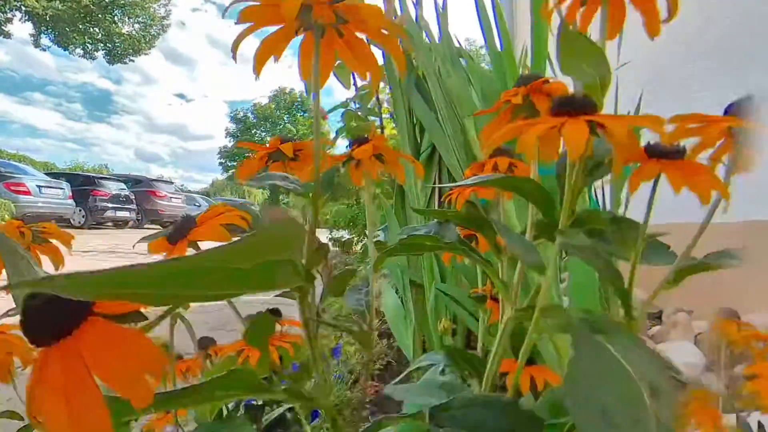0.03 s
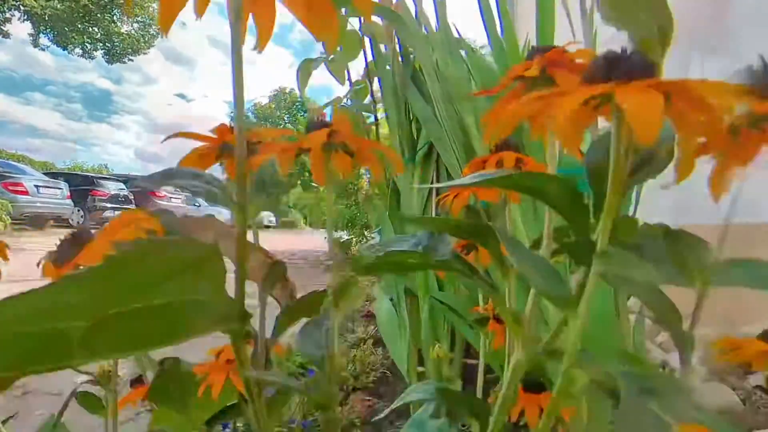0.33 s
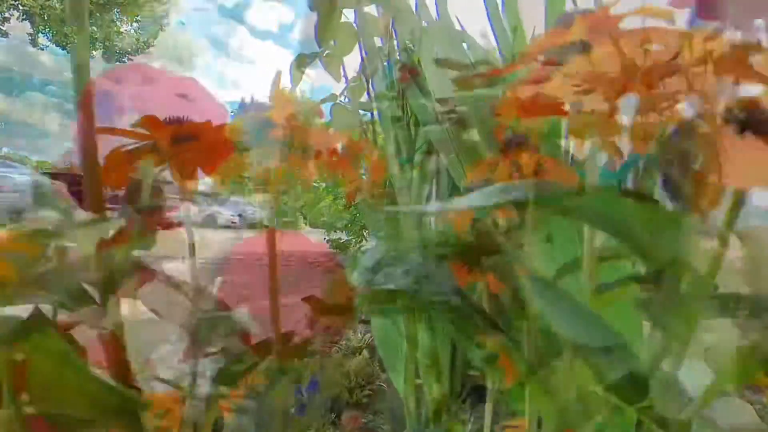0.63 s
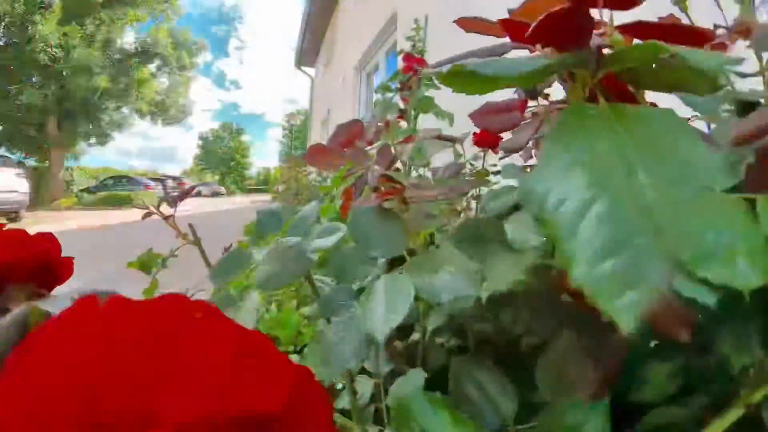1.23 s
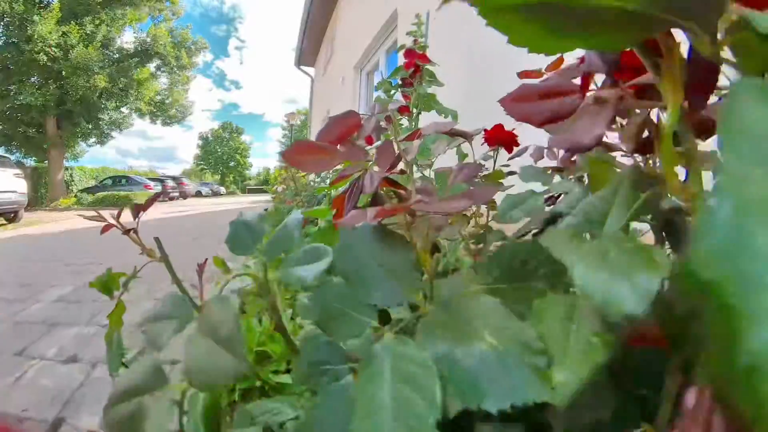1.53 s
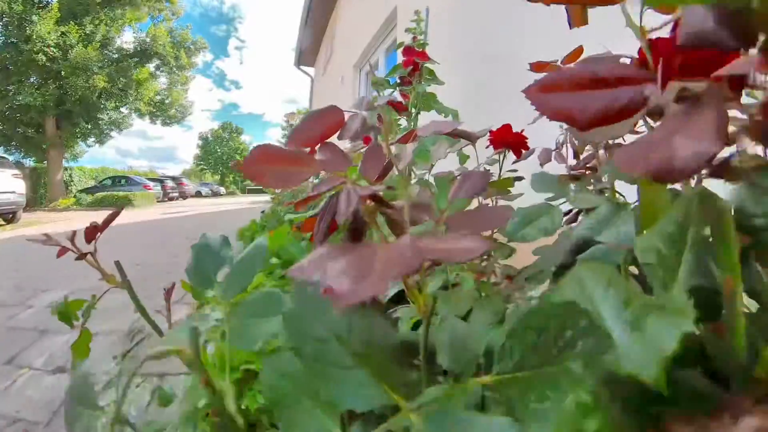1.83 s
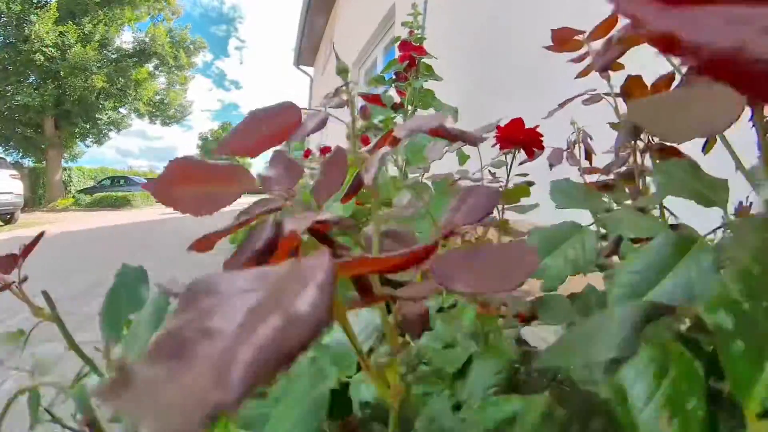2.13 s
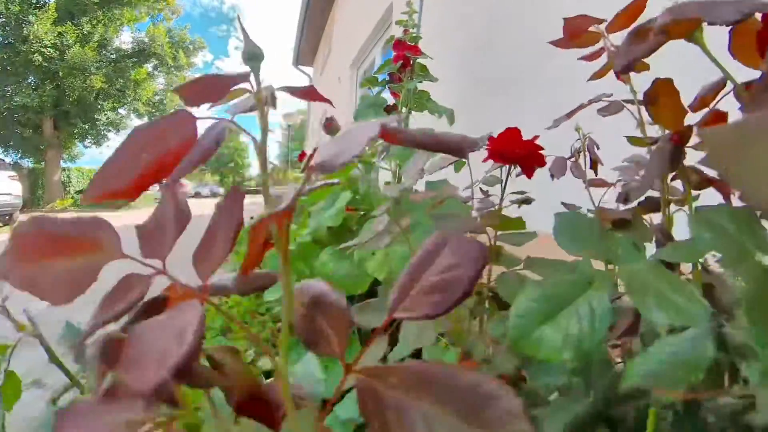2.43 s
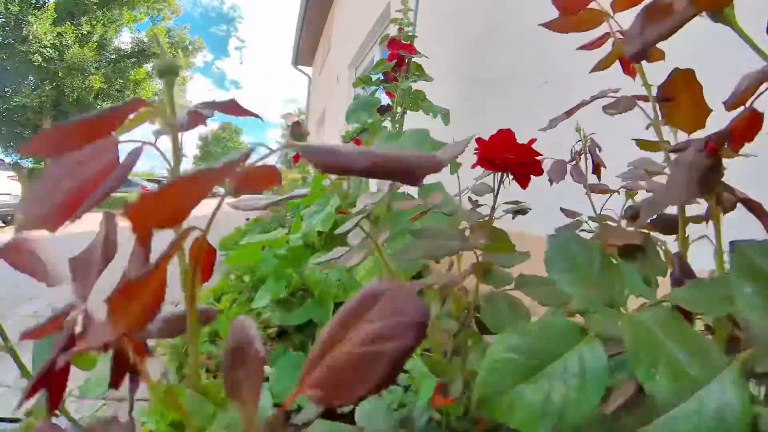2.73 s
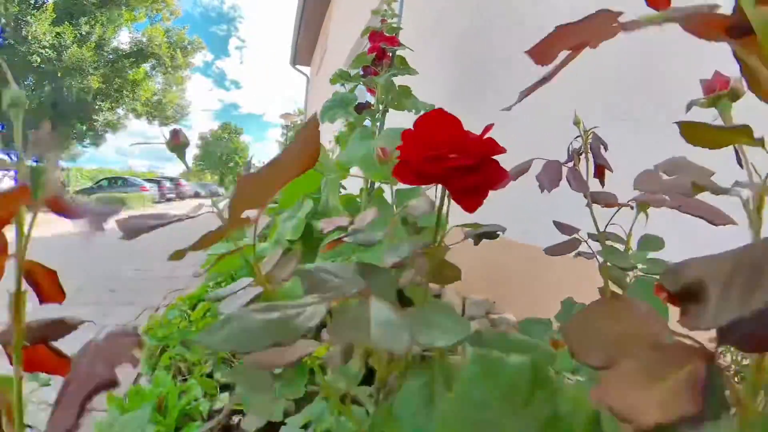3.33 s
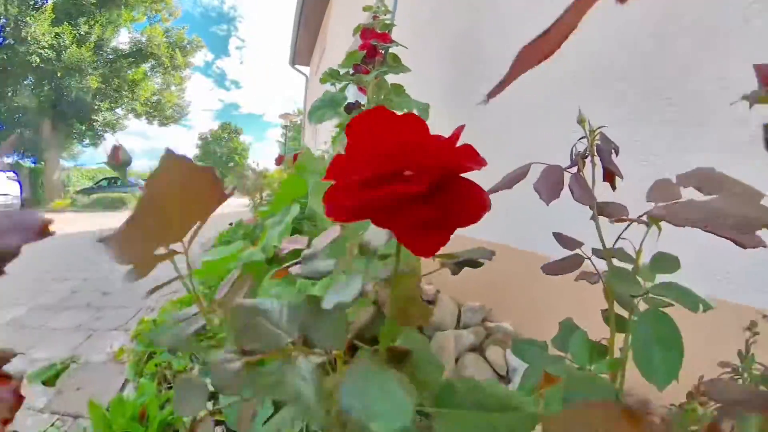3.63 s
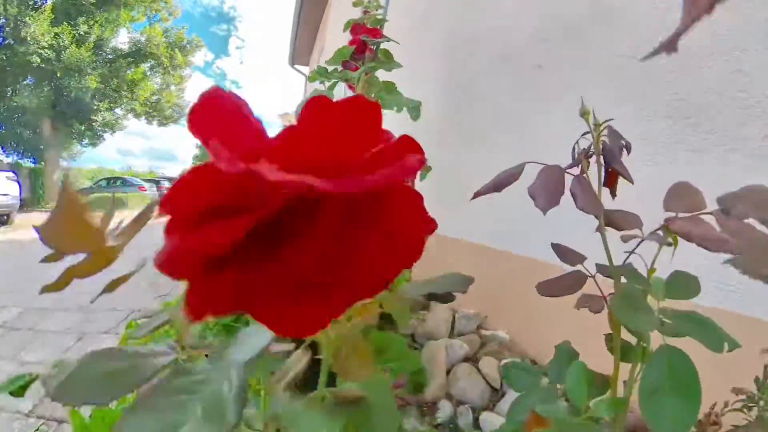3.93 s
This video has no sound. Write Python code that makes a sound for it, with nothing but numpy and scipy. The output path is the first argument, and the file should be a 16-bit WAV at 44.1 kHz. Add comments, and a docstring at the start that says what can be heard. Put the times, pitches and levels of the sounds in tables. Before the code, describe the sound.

Leaves rustle and stalks bump against a hand-held microphone moving through garden plants. After a lull, the brushing returns with small stem snaps, a scrape and one hard knock, all close and dry over a low outdoor wash.

```python
"""A hand-held camera pushes through garden plants: close, dry, nearly mono except in the treble.
First leaves swish past, dry canes clack and stalks bump the camera. A lull follows, with a knock and
a rub near 1.2 s. From 2 s leaves swish again and tap the housing, stalks knock and rub, stems snap.
At 3 s a leaf scrapes over the microphone; the hardest knock follows at 3.2 s, then more ticks and rubs.
A low outdoor wash, far tree hiss and the rumble of the grip run underneath to the end."""
import sys
import numpy as np
from scipy import signal
from scipy.io import wavfile
from scipy.ndimage import uniform_filter1d

SR = 44100
rng = np.random.default_rng(int(sys.argv[2]) if len(sys.argv) > 2 else 0)


def master_out(mix):
    """Clip the mix to full scale and print it as 16-bit PCM to the path in sys.argv[1]."""
    frames = np.transpose(np.atleast_2d(mix))
    ceiling = np.clip(frames, -1, 1)
    pcm = np.round(ceiling * 32767).astype(np.int16)
    wavfile.write(sys.argv[1], SR, pcm)


N = 176400  # 4 s

# Leaf passes: t/s, rise/s, t60/s, level/dB, tilt/(dB/oct), blade f/Hz
SWISHES = [(.087, .002, 0.66, -57.5, 0.5, 6300), (0.179, 0.0035, 0.25, -45.5, -4.5, 4900),
           (0.202, .008, 0.44, -53.5, -4, 5300), (.348, 0.016, -0.06, -54, -4, 5130),
           (2.081, 0.0045, 0.1, -52, 3, 6600), (2.193, .003, 1.3, -62, -2, 5200),
           (2.475, 0.032, 0.25, -53, 1.5, 5760), (2.535, 0.019, 0.9, -51.5, .8, 6100),
           (2.744, 0.0053, 0.5, -53, 8, 7160), (2.945, 0.013, 0.65, -49.5, -0.5, 4950),
           (3.215, 0.0032, 0.2, -56, -3, 2550), (3.425, 0.031, 0.7, -57, 0.5, 3950),
           (3.659, 0.0082, 0.46, -60, 0, 7600)]
# Leaf friction spectrum: f/Hz, level/dB
LEAF_SPECTRUM = [(250, -2.5), (700, -3), (1300, 4), (1950, 2), (2500, 2.5), (4500, -0.5), (6500, 2),
                 (7600, -4.5), (9000, -21), (11000, -60.5)]

def leaf_swishes():
    """Friction grains and sparse crackles ring a blade, swelling as it catches, fading as it slides off."""
    out, t = np.zeros(N), np.arange(SR // 2) / SR
    for start_s, rise_s, t60_s, db, tilt, hz in SWISHES:
        grains = unit_rms(slips(per_s=4600, spread_db=2))
        crackles = amp(-4.5) * unit_rms(slips(per_s=54, spread_db=0.85))
        hiss = unit_rms(colour((grains + crackles)[:len(t)], tilted(LEAF_SPECTRUM, tilt)))
        blade = amp(-9.5) * blade_mode(hiss, hz, width_hz=820)
        attack = np.minimum(t / rise_s, 1)
        fade = decay(np.maximum(t - rise_s, 0), max(t60_s, 0.04))
        add(out, start_s, amp(db) * unit_rms(hiss + blade) * attack * fade)
    return out


# Leaf taps: t/s, peak level/dB, f/Hz
TAPS = [(1.121, -33, 1230), (2.193, -33, 2440), (2.197, -33, 2230), (2.2052, -32.5, 1300),
        (2.2355, -36, 1610), (2.2811, -32, 970)]
# Tap crackle spectrum: f/Hz, level/dB
TAP_SPECTRUM = [(400, 3), (900, -4), (2800, -9), (3500, -31), (9000, -41)]

def leaf_taps(rise_s=0.00038):
    """A blade slaps the housing, crackles and rings for a few cycles."""
    out, t = np.zeros(N), np.arange(SR // 20) / SR
    envelope = np.minimum(t / rise_s, 1) * decay(t, t60_s=0.006)
    for start_s, db, hz in TAPS:
        crackle = amp(-1.5) * unit_rms(colour(rng.standard_normal(len(t)), TAP_SPECTRUM))
        ring = np.sin(2 * np.pi * hz * t)
        add(out, start_s, amp(db) * unit_peak((crackle - ring) * envelope))
    return out


# Dragged blade modes: f/Hz, width/Hz, level/dB
SCRAPE_MODES = [(580, 140, 4), (776, 96, 4), (1050, 480, 0.5), (1690, 290, -0.5), (2070, 110, -4),
                (2700, 610, -4)]
# Scrape filter: f/Hz, level/dB
SCRAPE_FILTER = [(200, 8.5), (500, 7.5), (3000, 5), (3800, -10), (8000, -28.5)]
# Scrape envelope: t/s, level/dB
SCRAPE_LEVEL = [(2.93, -73), (2.95, -49), (2.962, -60), (2.966, -40.5), (2.995, -41), (3.017, -40),
                (3.026, -58.5), (3.04, -69)]

def leaf_scrape():
    """A leaf judders across the microphone in uneven slips that ring its blade."""
    drive = slips(per_s=1100, spread_db=-2)
    blade = sum(amp(db) * blade_mode(drive, hz, width_hz) for hz, width_hz, db in SCRAPE_MODES)
    return unit_rms(colour(blade, SCRAPE_FILTER)) * gain_curve(SCRAPE_LEVEL)


# Stem snaps: t/s, peak level/dB, splinter t60/s, tilt/(dB/oct), main resonance f/Hz
TICKS = [(2.2165, -30, 0.031, -4.5, 5230), (2.348, -38, 0.062, -4, 5330), (2.396, -33.5, 0.008, 2.5, 6300),
         (2.546, -31, 0.008, 11, 6000), (2.759, -31.5, 0.032, -6, 6530), (3.089, -18, 0.029, -1, 6390),
         (3.2263, -23.5, 0.033, -11, 5150), (3.2547, -30, 0.0016, -5, 5260),
         (3.279, -30.5, 0.0044, 0, 5900), (3.3051, -38, 0.003, 2, 6430), (3.4195, -31, 0.023, -3, 5870),
         (3.4666, -33, 0.0096, -0.5, 5500), (3.5222, -24.5, 0.026, -3.5, 6100),
         (3.5273, -35, 0.0092, 3, 5340)]
# Spectrum of a stem ringing at STEM_HZ: f/Hz, level/dB
STEM_SPECTRUM = [(1250, -8), (1650, -1.5), (2050, -11), (2950, -10), (3650, 3), (4250, -9.5), (5000, -4),
                 (6400, 3.5), (7100, -5), (8200, -7), (8900, -22.5), (12000, -49)]
STEM_HZ = 6400

def stem_ticks():
    """A stem snaps: one click, then fast-dying splinters. Thicker stems ring lower."""
    out, t = np.zeros(N), np.arange(SR // 10) / SR
    click = 1.0 * (t == 0)
    for start_s, db, t60_s, tilt, hz in TICKS:
        splinters = amp(-19) * rng.standard_normal(len(t)) * decay(t, t60_s)
        stem = [(f * hz / STEM_HZ, band_db) for f, band_db in STEM_SPECTRUM]
        add(out, start_s, amp(db) * unit_peak(colour(click + splinters, tilted(stem, tilt))))
    return out


# Hard stalk hits: t/s, impact peak level/dB, tilt/(dB/oct)
KNOCKS = [(1.1213, -34.5, -2), (2.084, -22, -3), (3.2306, -13.5, -0.5)]
# Impact spectrum: f/Hz, level/dB
IMPACT_SPECTRUM = [(100, 0), (500, 9.5), (1200, -6.5), (2500, -16.5), (6000, -23.5), (9000, -54)]
# Housing modes: f/Hz, level/dB, t60/s
HOUSING_MODES = [(145, 0.5, 0.091), (237, -3.5, 0.048), (329, 5, 0.026), (680, -3.5, .03)]

def stalk_knocks(ring_db=-3.5, ring_delay_s=0.0012):
    """A sharp impact, duller for a softer stalk, then the housing's short low ring."""
    out, t = np.zeros(N), np.arange(SR // 5) / SR
    click = 1.0 * (t == 0)
    ring = struck(t, HOUSING_MODES)
    for start_s, db, tilt in KNOCKS:
        impact = unit_peak(colour(click, tilted(IMPACT_SPECTRUM, tilt)))
        add(out, start_s, -amp(db) * impact)
        add(out, start_s + ring_delay_s, amp(db + ring_db) * ring)
    return out


# Soft stalk hits: centre t/s, peak level/dB, f/Hz
BUMPS = [(0.058, -29, 48.7), (0.105, -29.5, 60), (.316, -33.5, 74), (1.425, -32, 98.5), (2.122, -32, 69),
         (2.136, -28.5, 110), (2.156, -30, 49.7), (3.192, -18.5, 55.6), (3.2108, -18.5, 75.5),
         (3.224, -21, 103), (3.259, -22, 68), (3.556, -24.5, 86)]

def stalk_bumps():
    """A soft push on the camera: one pressure swell with a dip on either side."""
    out, t = np.zeros(N), np.arange(-SR // 25, SR // 25) / SR
    for centre_s, db, hz in BUMPS:
        window = np.exp(-(hz * t / 0.45) ** 2)
        add(out, centre_s + t[0], amp(db) * np.cos(2 * np.pi * hz * t) * window)
    return out


# Stalk drags: t/s, length/s, level/dB
RUBS = [(1.227, 0.049, -48), (2.057, 0.14, -47), (2.395, 0.27, -48.5), (3.195, 0.079, -36.5),
        (3.391, 0.22, -42)]
# Stalk friction spectrum: f/Hz, level/dB
RUB_SPECTRUM = [(80, 0), (180, -0.5), (350, 3.5), (480, -7.5), (640, -5), (1000, -15.5), (2500, -51)]

def stalk_rubs():
    """Stalks drag along the housing: dull slips that swell and fade."""
    envelope = np.zeros(N)
    for start_s, length_s, db in RUBS:
        arch = np.sin(np.linspace(0, np.pi, round(length_s * SR)))
        add(envelope, start_s, amp(db) * arch)
    return envelope * unit_rms(colour(slips(per_s=770, spread_db=3.5), RUB_SPECTRUM))


# Cane hits: t/s, peak level/dB, tilt/(dB/oct)
CLACKS = [(.087, -44, 8), (0.1844, -35.5, -33)]
# Cane modes: f/Hz, level/dB, t60/s
CANE_MODES = [(1820, 6, 0.033), (1981, -4, 0.32), (3640, 1.5, 0.063), (6300, -7, 0.097)]

def cane_clacks():
    """Dry canes strike together and ring faintly."""
    out, t = np.zeros(N), np.arange(SR // 2) / SR
    for start_s, db, tilt in CLACKS:
        add(out, start_s, amp(db) * struck(t, CANE_MODES, tilt))
    return out


# Wash, tree and grip spectra: f/Hz, level/dB
WASH_SPECTRUM = [(15, -50), (25, -10.5), (54, -1), (103, -5), (205, -10.5), (269, -13), (354, -16.5),
                 (500, -20), (625, -21), (1680, -36), (5810, -40), (7260, -43.5), (9300, -65.5),
                 (12100, -100.5)]
TREE_SPECTRUM = [(800, -19), (1500, 7.5), (3000, 6.5), (6500, 7.5), (7500, -2), (9000, -22.5)]
GRIP_SPECTRUM = [(15, -22.5), (42, 2.5), (70, -1.5), (130, -9), (300, -36.5), (1000, -77)]
# Wash, tree and grip envelopes: t/s, level/dB
WASH_LEVEL = [(0, -46.5), (.7, -50.5), (1.2, -46), (1.9, -46), (2.6, -44), (4, -45.5)]
TREE_LEVEL = [(0, -75.5), (.7, -71.5), (1.3, -65.5), (2.2, -64), (3.4, -63), (4, -63)]
GRIP_LEVEL = [(0, -39.5), (.15, -50), (.6, -50), (1.9, -60.5), (2.5, -44.5), (2.8, -52), (3.2, -41),
              (3.7, -53), (4, -40)]

def background():
    """Low outdoor wash, hiss of distant trees, rumble of the hand on the grip."""
    wash = noise(WASH_SPECTRUM) * gain_curve(WASH_LEVEL)
    trees = noise(TREE_SPECTRUM) * gain_curve(TREE_LEVEL)
    grip = noise(GRIP_SPECTRUM) * gain_curve(GRIP_LEVEL)
    return wash + trees + grip


def slips(per_s, spread_db):
    """Stick-slip clicks of random time, sign and size."""
    size = amp(spread_db * np.minimum(rng.exponential(1, N), 4))
    return size * rng.choice([-1, 1], N) * (rng.random(N) < per_s / SR)


def blade_mode(drive, hz, width_hz, wander=0.06):
    """Leaf resonance at rms 1; its centre wanders as the blade bends."""
    bend = unit_rms(uniform_filter1d(rng.standard_normal(len(drive)), size=1500))
    carrier = np.exp(2j * np.pi * np.cumsum(hz * (1 + wander * bend)) / SR)
    pole = np.exp(-np.pi * width_hz / SR)
    baseband = signal.lfilter([1 - pole], [1, -pole], drive / carrier)
    return unit_rms((carrier * baseband).real)


def struck(t, modes, tilt=0):
    """Decaying sine modes of a struck body, at peak 1."""
    return unit_peak(sum(amp(db + tilt * np.log2(hz)) * np.sin(2 * np.pi * hz * t) * decay(t, t60_s)
                         for hz, db, t60_s in modes))


def flicker(x, depth_db):
    """The treble flickers in patches a few hundred Hz wide and tens of ms long."""
    frames = dict(nperseg=512, noverlap=384)
    hz, _, spectra = signal.stft(x, SR, **frames)
    patches = uniform_filter1d(rng.standard_normal(spectra.shape), size=4, axis=0)
    patches = unit_rms(uniform_filter1d(patches, size=12, axis=1))
    treble = np.minimum(hz / 2000, 1)[:, None]
    return signal.istft(spectra * amp(depth_db * patches * treble), **frames)[1][:N]


def colour(x, spectrum, size=8192):
    """Minimum-phase filter from (f/Hz, level/dB) points."""
    hz, db = np.transpose(spectrum)
    bins_hz = abs(np.fft.fftfreq(size, 1 / SR))
    log_gain = np.log(amp(np.interp(np.log(bins_hz + 1), np.log(hz + 1), db)))
    response = np.exp(np.conj(signal.hilbert(log_gain)))
    impulse = np.fft.ifft(response).real[:size // 2]
    return signal.fftconvolve(x, impulse)[:len(x)]


def tilted(spectrum, db_per_oct):
    return [(hz, db + db_per_oct * np.log2(hz)) for hz, db in spectrum]


def noise(spectrum):
    return unit_rms(colour(rng.standard_normal(N), spectrum))


def gain_curve(points):
    return amp(np.interp(np.arange(N) / SR, *np.transpose(points)))


def decay(t, t60_s):
    return np.exp(-np.log(1000) * t / t60_s)


def amp(db):
    return 10 ** (np.asarray(db) / 20)


def unit_rms(x):
    return x / np.sqrt(np.mean(x ** 2) + 1e-20)


def unit_peak(x):
    return x / (abs(x).max() + 1e-20)


def add(mix, start_s, sound):
    part = mix[max(round(start_s * SR), 0):][:len(sound)]
    part += sound[:len(part)]


def scene():
    """Contacts sit in the centre; background and swishes spread a little in the treble."""
    contacts = (stalk_bumps() + stalk_knocks() + cane_clacks() + stem_ticks()
                + leaf_taps() + leaf_scrape() + stalk_rubs())
    bed = flicker(background(), depth_db=2)
    rustle = flicker(leaf_swishes(), depth_db=4)
    mid = contacts + rustle + bed
    side = treble_spread()
    return np.array([mid + side, mid - side])


# Side-channel filter: f/Hz, level/dB
SIDE_FILTER = [(1000, -66.5), (2600, -55.5), (3100, -9), (4500, -5), (6000, -8), (6800, -44.5)]

def treble_spread():
    """Side signal: independent background and quieter swishes, mainly 3-6 kHz."""
    diffuse = background() + amp(-10) * leaf_swishes()
    return colour(flicker(diffuse, depth_db=4), SIDE_FILTER)


def record(dry):
    """The recorder's band limit."""
    cutoff_hz = 9450
    lowpass = signal.firwin(95, cutoff_hz, window=("kaiser", 5), fs=SR)
    return signal.oaconvolve(dry, lowpass[None], "same")


dry = scene()
out = record(dry)
master_out(out)
```